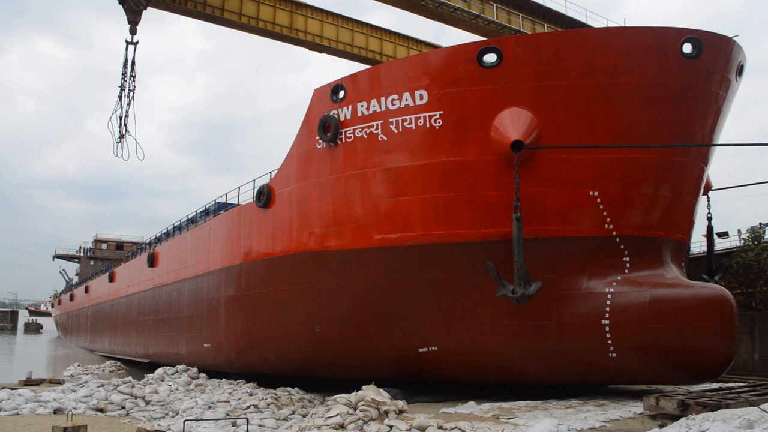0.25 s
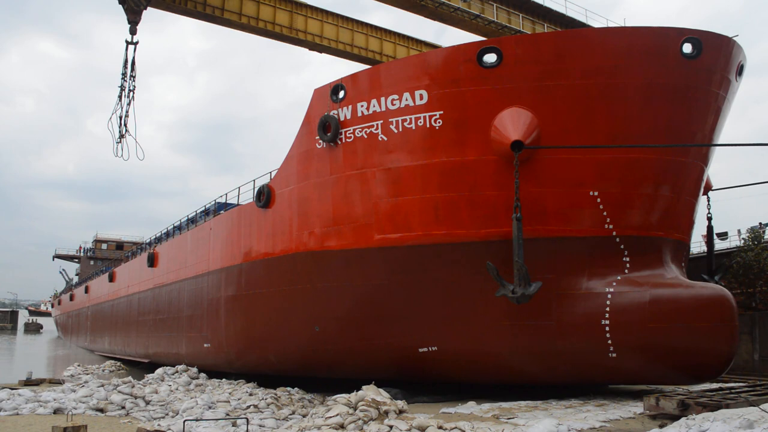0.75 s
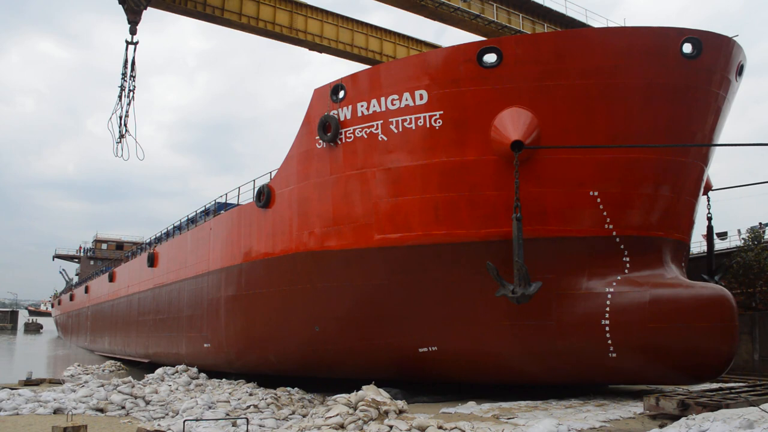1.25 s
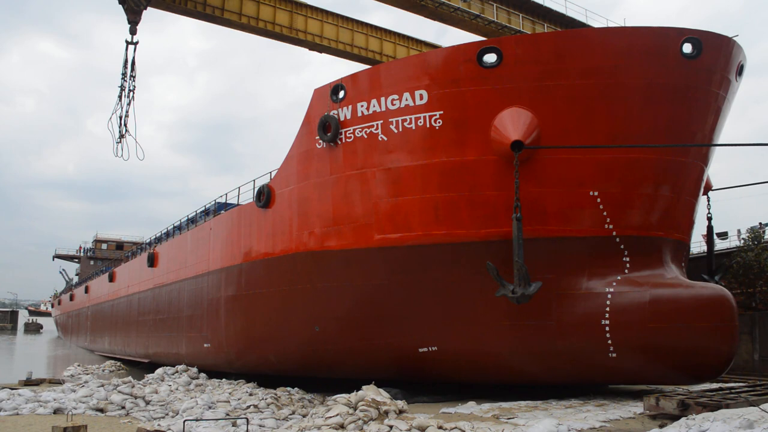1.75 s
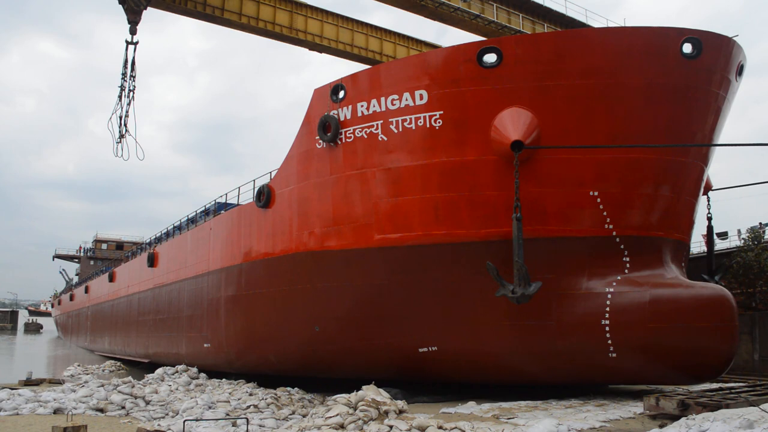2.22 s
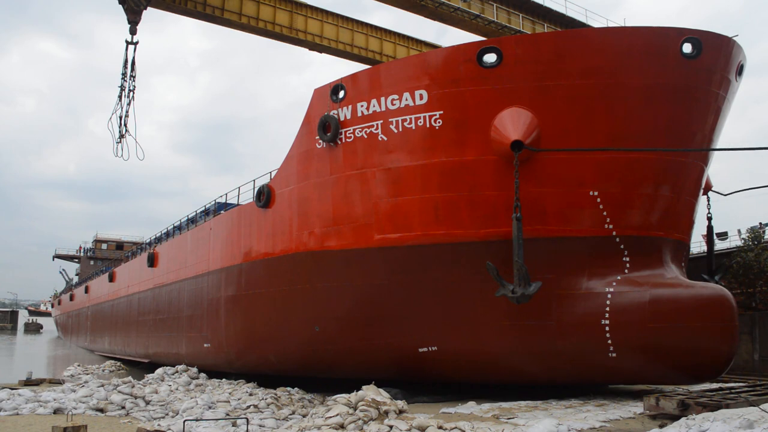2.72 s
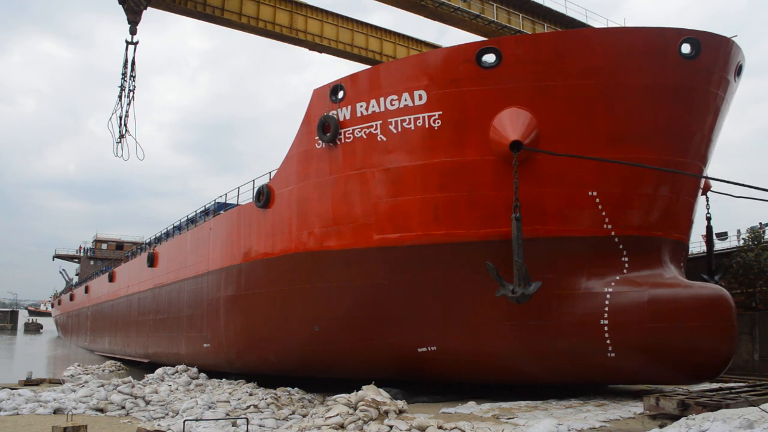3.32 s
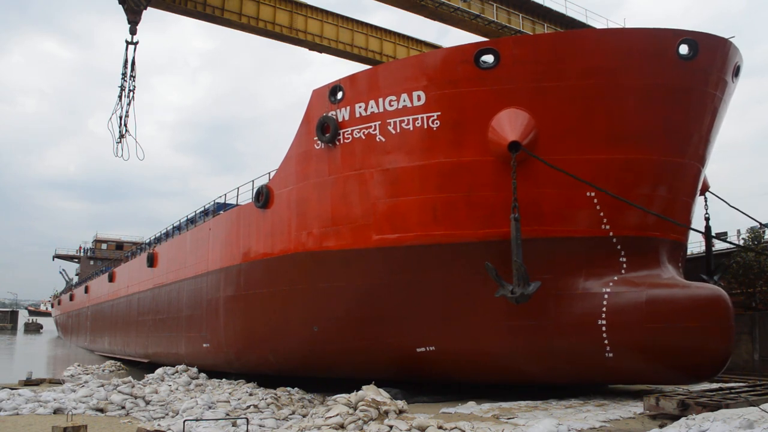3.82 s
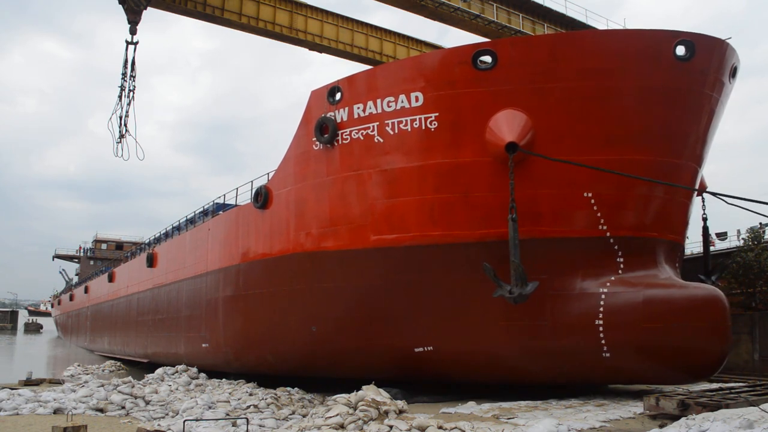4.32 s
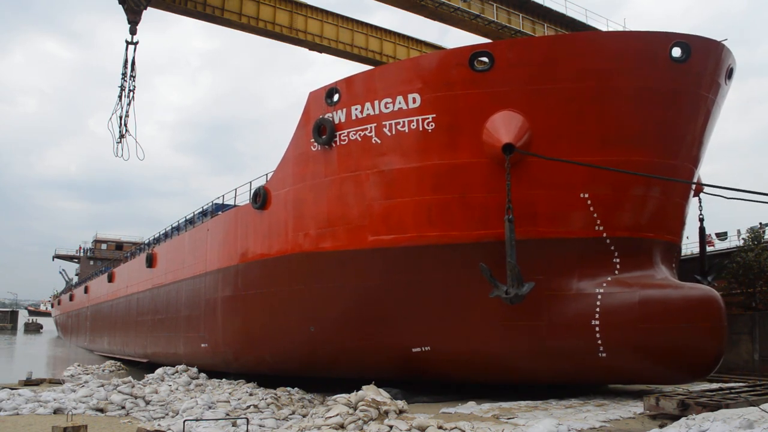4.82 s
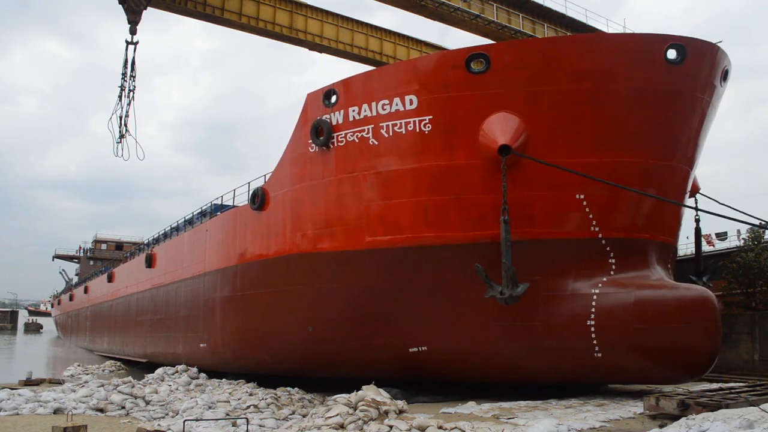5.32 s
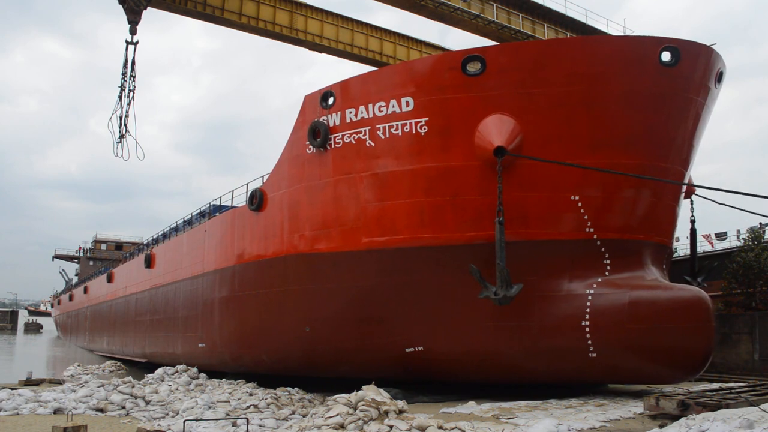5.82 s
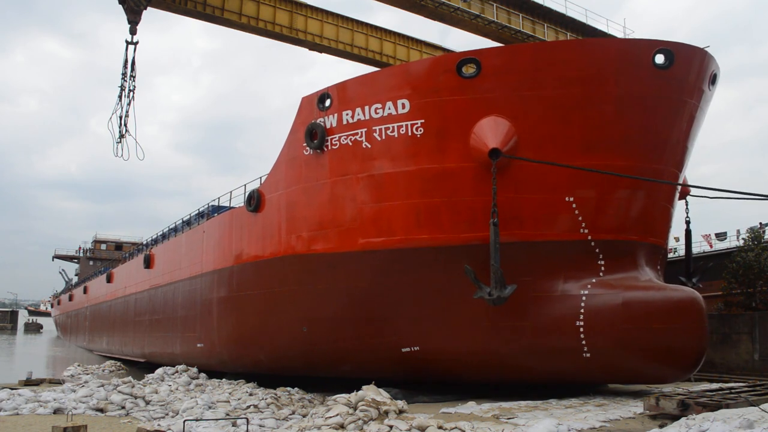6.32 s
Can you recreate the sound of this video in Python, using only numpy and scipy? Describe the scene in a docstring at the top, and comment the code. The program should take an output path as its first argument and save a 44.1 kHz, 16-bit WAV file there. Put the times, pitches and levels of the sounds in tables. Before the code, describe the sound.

In a shipyard, an air line hisses and puffs over droning distant machines, low wind and faint bird chirps. Two dull thuds sound, then a volley of sharp steel bangs and booms overloads the microphone as a ship breaks loose. The hull grinds down the slipway in a loud, steady roar, with ringing plates and a few brief friction groans. The sound is mono, with a faint yard echo.

```python
"""First an air line hisses and puffs over far machines, wind and small birds. Then a steel hull breaks
loose on its slipway: two dull thuds, a volley of sharp bangs and booms as the holding gear lets go,
and the roar of the hull grinding down the ways, groaning with friction as it gathers speed.
Blows and grinding set the hull plates ringing. The microphone is mono and overloads on the bangs."""
import sys
import numpy as np
from scipy import signal
from scipy.io import wavfile
from scipy.ndimage import uniform_filter1d

SR = 44100
rng = np.random.default_rng(int(sys.argv[2]) if len(sys.argv) > 2 else 0)


def persist_wave(psi):
    """Save psi, clipped to +-1, as 16-bit WAV."""
    counts = np.round(np.clip(psi, -1, 1) * 32767).astype(np.int16)
    wavfile.write(sys.argv[1], SR, np.atleast_2d(counts).T)


N = 289251

# drone of the far machines: freq_hz, level_db
MACHINE_SPECTRUM = [(35, -51), (60, -10), (162, -4), (448, -6.5), (486, -10), (526, -3.5), (617, -8),
                    (1370, -9), (1510, -10), (3280, -16.5), (7000, -42.5), (9100, -76.5), (15400, -120)]
# tone of the low rumble: freq_hz, level_db
RUMBLE_SPECTRUM = [(12, 10), (25, 10.5), (50, 23), (90, 20), (150, -55)]
# level of the low rumble, with a brief low swell near 2.7 s and a drop after: time_s, level_db
RUMBLE_LEVELS = [(0.0, -36), (2.08, -42), (2.7, -29.5), (3.05, -52.5), (6.56, -46)]
# small birds: start_s, length_s, from_hz, to_hz, level_db
BIRD_CHIRPS = [(.095, .07, 4150, 3900, -43.5), (.2, .06, 4130, 3980, -44.5), (1.09, .09, 4750, 4430, -43),
               (1.215, .06, 4170, 3950, -41.5), (1.3, .05, 4000, 4150, -43.5), (1.37, .16, 3060, 2980, -45)]
# hiss of escaping air: freq_hz, level_db
AIR_SPECTRUM = [(1760, -29), (2500, -11), (3000, -12), (3350, -5.5), (4990, -2.5), (5420, -1.5), (5920, -4),
                (6660, -4), (9190, -2.5), (10900, -4), (15500, -25.5)]
# level of the hiss before it fades: time_s, level_db
LEAK_LEVELS = [(0.0, -35.5), (1.55, -34), (1.7, -37), (1.89, -37.5), (1.97, -32.5), (2.32, -36),
               (2.62, -29)]
# the line venting: start_s, length_s, level_db
AIR_PUFFS = [(0.496, 0.41, -27.5), (0.94, .27, -26), (1.247, 0.14, -27.5)]
# tone of the puffs against the leak: freq_hz, boost_db
PUFF_EQ = [(2000, 7.5), (4500, -7.5), (6500, 1), (9200, 2), (12000, 2)]
# resonances of the hull plates: pitch_hz, width_hz, gain_db
PLATE_MODES = [(159.2, 37, -7.5), (225, 24, -1), (311.6, 46, -7.5), (573, 7.9, 2), (750, 13.94, -15),
               (1064, 10, 1), (1413, 13, 0), (1766, 21, 0), (2210, 11, 3.5), (2600, 15, 5), (3060, 21, 0),
               (3435, 25, 1), (3689, 23, 0), (4120, 17, -1), (4650, 25, 1), (5480, 25, 2), (5975, 30, -2),
               (6500, 40, -2.5)]
# friction groans: start_s, length_s, pitch_hz, level_db
HULL_GROANS = [(3.04, 0.25, 1047, -28), (3.049, .2, 590, -24.5), (3.3, .33, 581, -23.5),
               (3.303, 0.28, 656, -28.5), (3.48, 0.15, 369, -27), (4.42, 0.13, 220, -24)]
# deep blows through the hull:
# start_s, level_db, hold_s, bass_t60_s, tilt_db_per_octave, push_gain_db, band_hz, band_boost_db
HULL_THUDS = [(1.43, -29, 0.024, 11, 2.5, -36, 537, 12), (1.522, -19, 0.13, 2.5, -2, -26, 330, -1),
              (1.9, -17, 0.12, 5, -2.5, -13, 220, 7.5), (2.631, -11, 0.1, 1.5, 1, -6, 158.5, 11),
              (2.743, -13.5, 0.09, 1, 1.5, -25, 450, 16), (3.247, -13, 0.19, 5.5, 1.26, -19, 600, 1)]
# body of a thud: freq_hz, level_db
THUD_SPECTRUM = [(29, -41), (50, -18.5), (123, 0), (209, -1.5), (307, 4), (343, 2.5), (573, 1.5),
                 (2880, -21), (3210, -27), (4000, -21.5), (5200, -61.5), (8800, -120)]
# steel striking steel: start_s, level_db, rise_s, rattle_s, tilt_db_per_octave, plate_hz, ring_db
GEAR_BANGS = [(1.567, -29.5, 0.012, .028, 8.5, 5740, -60), (1.96, -25.5, 0.043, 0.08, -9, 1308, -53.5),
              (2.633, -6.5, 0.031, 0.044, 4.5, 1450, -28.5), (2.692, -10, 0.003, 0.034, -2, 1790, -29.5),
              (2.763, -17.5, 0.008, 0.037, -1.5, 1100, -32), (2.881, -19.5, 0.015, 0.024, 1, 2180, -44),
              (2.928, -6.5, 0.005, 0.035, -1, 1420, -30), (2.948, -10.5, 0.0062, 0.032, -3.5, 1048, -28),
              (2.979, -14, 0.01, 0.018, -5, 1378, -26), (3.011, -19, 0.006, 0.014, -7, 2203, -35),
              (3.256, -28, 0.0053, 0.027, 2.5, 585, -39.5), (3.632, -33, 0.009, 0.049, -4, 779, -28)]
# crash of a bang: freq_hz, level_db
BANG_SPECTRUM = [(290, -23), (500, -3), (657, -33), (726, -17.5), (1100, 1), (1390, -4), (1960, -6.5),
                 (2930, -5.5), (3960, -7.5), (9930, -11.5), (15500, -35)]
# time for the crash to fall 60 dB: freq_hz, t60_s
BANG_DECAY = [(500, 0.45), (1500, 0.51), (4000, 0.84), (8000, 0.39), (14000, 0.25)]
# time for the yard echo to fall 60 dB: freq_hz, t60_s
ECHO_DECAY = [(500, 5), (1500, 3.3), (4000, 2.8), (8000, 2.5), (11000, 2), (14000, 1)]
# hull grinding on the ways: freq_hz, level_db
GRIND_SPECTRUM = [(25, -34), (45, -30), (66, -14.5), (80, -16.5), (120, -10.5), (150, -4), (200, 1.5),
                  (290, -4), (360, -1), (595, -1), (900, -3), (1250, -5.5), (1760, -11), (2500, -18),
                  (4120, -31), (6640, -41), (7700, -53.5), (11700, -83.5), (19800, -120)]
# the hull bites harder: start_s, brighten_db_per_octave, bass_db, ease_s
GRIND_SURGES = [(2.949, 5, -6.5, 0.82), (3.5, 3.5, -1.5, 0.25), (4.05, 1, 0, 0.33), (4.348, 5.5, -3, 0.32),
                (4.72, 2.5, -1, 0.36), (6.061, 4, -4, 0.47)]


def gain_of(db):
    """Decibels to gain."""
    return 10 ** (np.asarray(db) / 20)


def unit_rms(x):
    """Scales to rms 1."""
    return x / np.sqrt(np.mean(x ** 2) + 1e-20)


def at_freq(points, hz):
    """Reads a table along a log-frequency axis."""
    freqs, values = np.transpose(points)
    return np.interp(np.log(hz + 1), np.log(freqs + 1), values)


def fader(points):
    """A level curve in dB at every sample."""
    return np.interp(np.arange(N) / SR, *np.transpose(points))


def bell(hz, centre_hz, octaves):
    """A bell-shaped EQ curve of height 1."""
    return np.exp(-(np.log2(hz / centre_hz + 0.00095) / octaves) ** 2)


def add(mix, start_s, sound):
    """Mixes a sound in at start_s."""
    part = mix[round(start_s * SR):][:len(sound)]
    part += sound[:len(part)]


def noise(colour_db, count, size, patchy_db, flicker_db=0.58):
    """Noise shaped by colour_db(hz, t), starting near rms 1; its bands and overall level flutter."""
    hop = size // 4
    hz = np.fft.rfftfreq(size, 1 / SR)[:, None]
    t = np.arange(count // hop + 6) * hop / SR
    real, imag, patches = rng.standard_normal((len(t), len(hz), 3)).T
    patches = uniform_filter1d(patches, size=size // 100, axis=0)
    patches = unit_rms(uniform_filter1d(patches, size=12000 // size, axis=1))
    flicker = unit_rms(uniform_filter1d(rng.standard_normal(len(t)), size=3))
    flutter = gain_of(patchy_db * patches + flicker_db * flicker)
    shape = gain_of(colour_db(hz, t) + 0 * t)
    spectra = (real + 1j * imag) * shape * flutter / np.linalg.norm(shape[:, 0])
    return signal.istft(spectra, nperseg=size, noverlap=size - hop)[1][:count] * np.sqrt(2 / 3)


def machines():
    """Far machines blur into a steady bed of yard noise."""
    drone = noise(lambda hz, t: at_freq(MACHINE_SPECTRUM, hz), N, 1024, patchy_db=0.8, flicker_db=0.3)
    return gain_of(-30.5) * drone


def low_rumble():
    """A low, windy rumble under the yard; the low end swells briefly near 2.7 s with the blows, then the
    background drops."""
    rumble = noise(lambda hz, t: at_freq(RUMBLE_SPECTRUM, hz), N, 4096, patchy_db=1)
    return gain_of(fader(RUMBLE_LEVELS)) * rumble


def birds():
    """Short slurred whistles, a little unsteady, smeared by the yard's echo."""
    slur_power, waver_depth, echo_t60_s, echo_db = 1.8, 0.008, 0.22, -6
    out = np.zeros(N)
    for start_s, length_s, from_hz, to_hz, level_db in BIRD_CHIRPS:
        progress = np.linspace(0, 1, round(length_s * SR))
        hz = from_hz + (to_hz - from_hz) * progress ** slur_power
        waver = unit_rms(uniform_filter1d(rng.standard_normal(4 * SR // 10), size=400))[:len(hz)]
        whistle = np.sin(2 * np.pi * np.cumsum(hz * (1 + waver_depth * waver)) / SR)
        add(out, start_s, gain_of(level_db) * whistle * np.sqrt(np.sin(np.pi * progress) + 1e-9))
    echo = rng.standard_normal(SR // 2) * gain_of(-60 * np.arange(SR // 2) / SR / echo_t60_s)
    return out + gain_of(echo_db) * signal.oaconvolve(out, echo / np.linalg.norm(echo))[:N]


def air_line():
    """A leaking line hisses and vents in puffs; the hiss fades away as the bangs begin."""
    rise_s, fall_s, fade_s, fade_db_per_s = 0.08, 0.094, 2.41, -38
    t = np.arange(N) / SR
    leak = gain_of(fader(LEAK_LEVELS) + fade_db_per_s * np.maximum(t - fade_s, 0))
    puff_power = np.zeros(N)
    for start_s, length_s, level_db in AIR_PUFFS:
        attack = np.clip((t - start_s) / rise_s, 0, 1) ** 0.5
        release = np.exp(-np.maximum(t - start_s - length_s, 0) / fall_s)
        puff_power += (gain_of(level_db) * attack * release) ** 2
    hiss = noise(lambda hz, t: at_freq(AIR_SPECTRUM, hz), N, 512, patchy_db=1)
    vent = noise(lambda hz, t: at_freq(AIR_SPECTRUM, hz) + at_freq(PUFF_EQ, hz), N, 512, patchy_db=0)
    return leak * hiss + np.sqrt(puff_power) * vent


def hull_plates(shaking):
    """The hull plates ring with whatever shakes them, one resonator a mode."""
    out = np.zeros(N)
    for pitch_hz, width_hz, gain_db in PLATE_MODES:
        radius = np.exp(-np.pi * width_hz / SR)
        feedback = [1, -2 * radius * np.cos(2 * np.pi * pitch_hz / SR), radius ** 2]
        out += gain_of(gain_db) * (1 - radius ** 2) * signal.lfilter([1, 0, -1], feedback, shaking)
    return out


def groans():
    """Friction excites one narrow resonance of the hull for a moment."""
    width_hz = 28  # of each of two filter passes
    out = np.zeros(N)
    for start_s, length_s, pitch_hz, level_db in HULL_GROANS:
        peak = signal.iirpeak(pitch_hz, pitch_hz / width_hz, SR)
        friction = signal.lfilter(*peak, rng.standard_normal(SR))
        tone = unit_rms(signal.lfilter(*peak, friction))[-round(length_s * SR):]
        add(out, start_s, gain_of(level_db) * tone * signal.windows.tukey(len(tone), 0.5))
    return out


def thuds():
    """A low push, then a dull boom that rolls through the hull and fades, the top end first."""
    punch_db, punch_s, boost_fade_s = 1.5, 0.04, 0.096
    out, t = np.zeros(N), np.arange(2 * SR) / SR
    push = -np.sin(2 * np.pi * 150 * t) * 300 * t * np.exp(-t / 0.0041)
    for start_s, level_db, hold_s, t60_s, tilt, push_db, band_hz, boost_db in HULL_THUDS:
        def colour_db(hz, age_s):
            tail_s = np.maximum(age_s - hold_s, 0)
            fall_db = -60 * tail_s / t60_s * (1 + hz / 1500)
            band_db = boost_db * bell(hz, band_hz, 85 / band_hz) * np.exp(-tail_s / boost_fade_s)
            return at_freq(THUD_SPECTRUM, hz) + tilt * np.log2(hz / 300 + 0.1) + band_db + fall_db
        boom = noise(colour_db, len(t), 1024, patchy_db=1.5, flicker_db=-0.6)
        attack = np.clip(t / (0.1 * hold_s), 0, 1)
        envelope = attack * gain_of(level_db + punch_db * np.exp(-t / punch_s))
        add(out, start_s, envelope * boom + gain_of(push_db) * push)
    return out


def contacts(t, rattle_s):
    """Gain spikes: single steel contacts stand out of a rattle and die away after it."""
    rate_per_s, spike_s, fade_s = 250, 0.0008, 0.05
    hits = rng.exponential(1, len(t)) * (rng.random(len(t)) < rate_per_s / SR)
    spikes = signal.lfilter([1], [1, -np.exp(-1 / (spike_s * SR))], hits)
    return 1 + 0.6 * spikes * np.exp(-np.maximum(t - rattle_s, 0) / fade_s)


def clang(t, plate_hz, rattle_s):
    """Nine close modes of a struck plate beat roughly, louder while the rattle lasts."""
    spread, t60_cycles, struck_db, settle_s = 0.02, 2300, 4, 0.03
    detune, phase = rng.uniform(-1, 1, (2, 9, 1))
    modes = np.sin(2 * np.pi * plate_hz * (1 + spread * detune) * t + np.pi * phase)
    boost_db = struck_db * np.exp(-np.maximum(t - rattle_s, 0) / settle_s)
    return gain_of(boost_db - 60 * t * plate_hz / t60_cycles) * unit_rms(modes.sum(axis=0))


def bangs():
    """The holding gear lets go: a hard rattle, a quick fall, a faint yard echo and a ringing plate."""
    parting_db, parting_s, echo_start_db = -4.5, 0.009, -18
    out, t = np.zeros(N), np.arange(3 * SR // 2) / SR
    for start_s, level_db, rise_s, rattle_s, tilt, plate_hz, ring_db in GEAR_BANGS:
        def colour_db(hz, age_s):
            tail_s = np.maximum(age_s - rattle_s, 0)
            drop_db = parting_db * (1 - np.exp(-tail_s / parting_s))  # the contacts part
            fall_db = drop_db - 60 * tail_s / at_freq(BANG_DECAY, hz)
            echo_db = echo_start_db - 60 * age_s / at_freq(ECHO_DECAY, hz)
            eq_db = tilt * np.log2(hz / 3000 + 0.1) + 7 * bell(hz, plate_hz, octaves=0.1)
            return at_freq(BANG_SPECTRUM, hz) + eq_db + np.maximum(fall_db, echo_db)
        crash = noise(colour_db, len(t), 256, patchy_db=1.2, flicker_db=1.2) * contacts(t, rattle_s)
        ring = gain_of(ring_db) * clang(t, plate_hz, rattle_s)
        add(out, start_s, (gain_of(level_db) * crash + ring) * np.clip(t / rise_s, 0, 1))
    return out


def hull_slide():
    """The hull grinds down the ways in a dense roar; each harder bite brightens it, then eases off."""
    moves_s, gather_s, level_db, swell_db_per_s = 2.575, 0.26, -12, 0.07
    surge_rise_s, calm_db_per_octave = 0.15, -2.5

    def colour_db(hz, t):
        octaves = np.log2(1 + hz / 700)  # tilts act mainly above 700 Hz
        tone_db = at_freq(GRIND_SPECTRUM, hz) + calm_db_per_octave * octaves
        for start_s, brighten, bass_db, ease_s in GRIND_SURGES:
            age_s = np.maximum(t - start_s, 0)
            surge = np.minimum(age_s / surge_rise_s, 1) * np.exp(-age_s / ease_s)
            tone_db = tone_db + (brighten * octaves + bass_db) * surge
        return tone_db
    roar = noise(colour_db, N, 2048, patchy_db=0.5, flicker_db=0.45)
    sliding_s = np.arange(N) / SR - moves_s
    return gain_of(level_db + swell_db_per_s * sliding_s) * roar * np.clip(sliding_s / gather_s, 0, 1)


def scene():
    """The launch over the yard ambience, mono on both channels; bangs drive the plates hardest."""
    sharp, dull, roar = bangs(), thuds(), hull_slide()
    shaking = gain_of(-6.5) * sharp + gain_of(-15) * dull + gain_of(-18.5) * roar
    launch = sharp + dull + roar + hull_plates(shaking) + groans()
    mono = launch + machines() + air_line() + low_rumble() + birds()
    return np.array([mono, mono])


def record(dry):
    """The microphone clips on the bangs, then a steep low-pass trims the top end."""
    ceiling, cutoff_hz = 0.95, 15680
    lowpass = signal.firwin(511, cutoff_hz, window=("kaiser", 9), fs=SR)
    return signal.oaconvolve(np.clip(dry, -ceiling, ceiling), lowpass[None], "same")


dry = scene()
out = record(dry)
persist_wave(out)
```